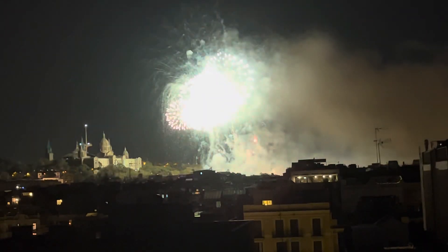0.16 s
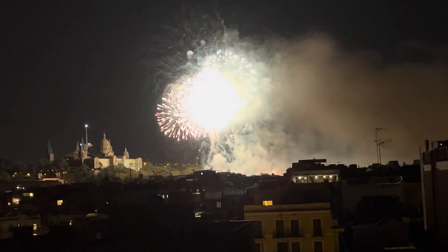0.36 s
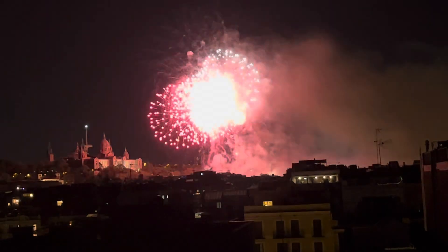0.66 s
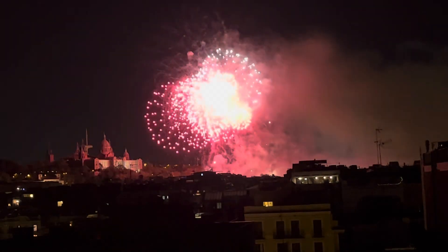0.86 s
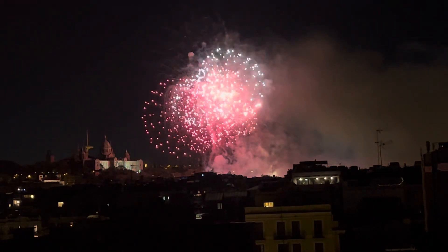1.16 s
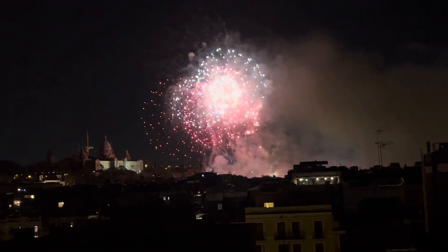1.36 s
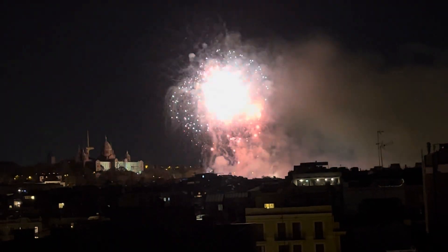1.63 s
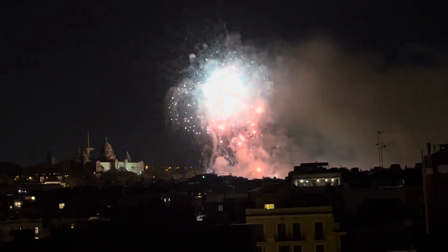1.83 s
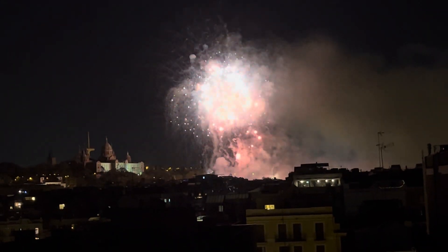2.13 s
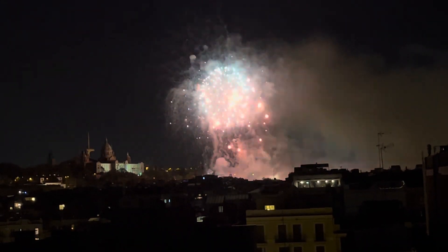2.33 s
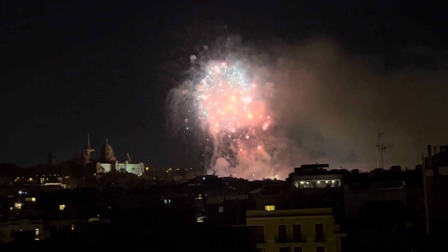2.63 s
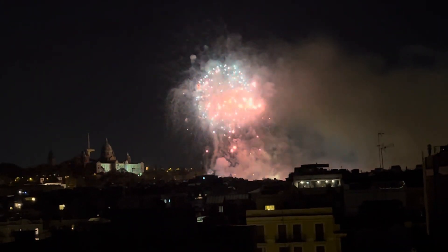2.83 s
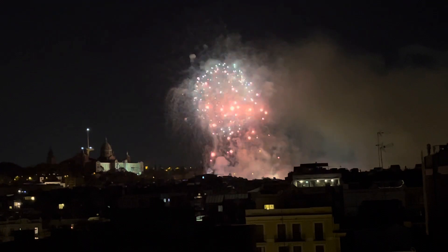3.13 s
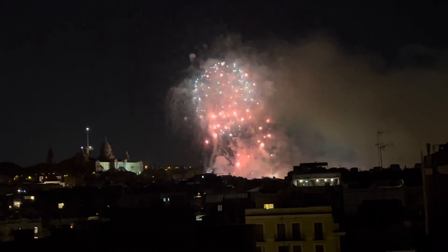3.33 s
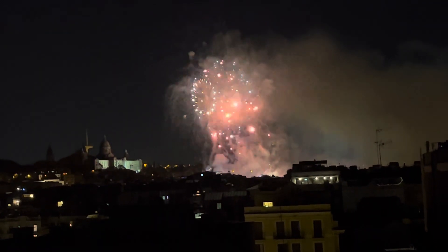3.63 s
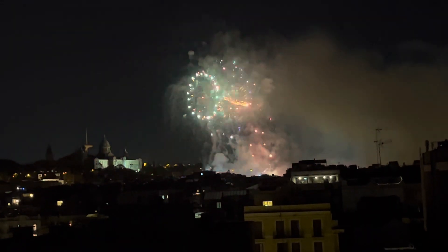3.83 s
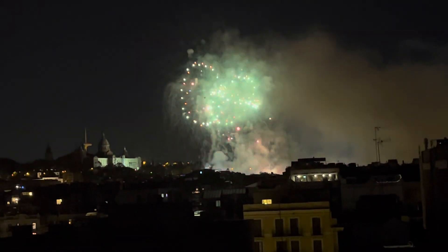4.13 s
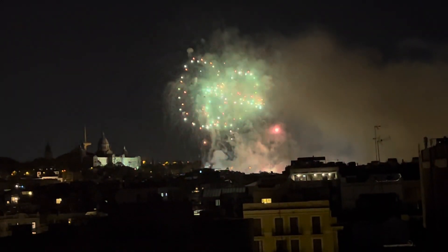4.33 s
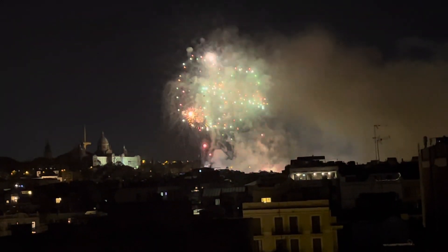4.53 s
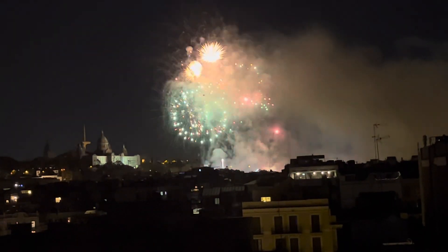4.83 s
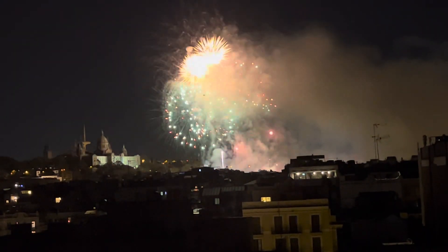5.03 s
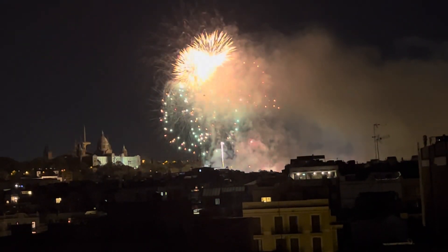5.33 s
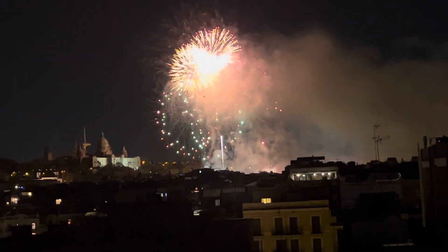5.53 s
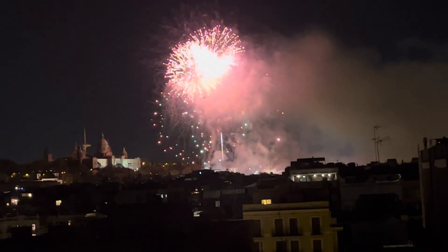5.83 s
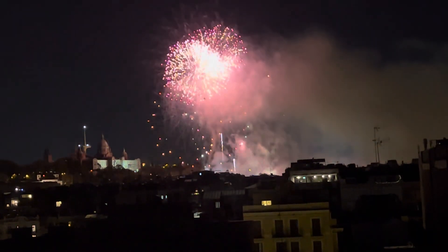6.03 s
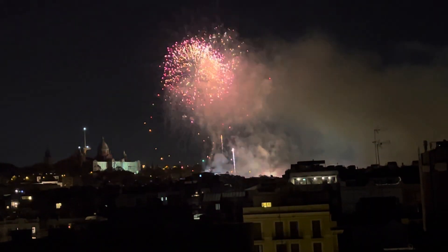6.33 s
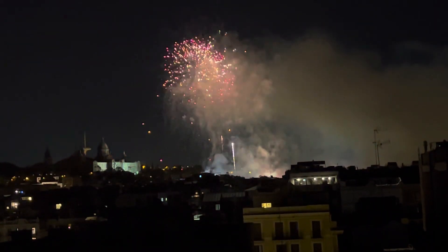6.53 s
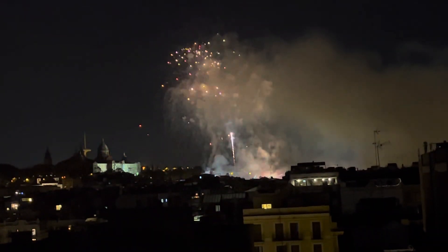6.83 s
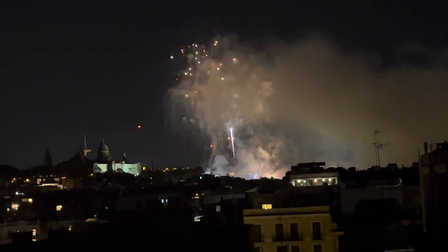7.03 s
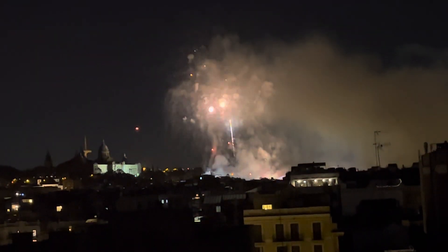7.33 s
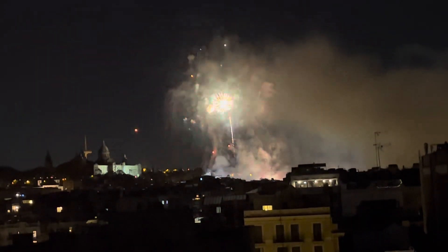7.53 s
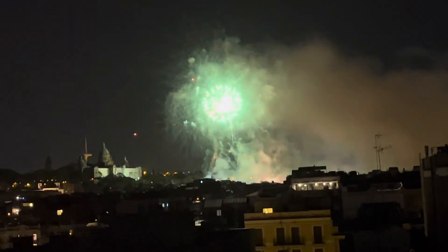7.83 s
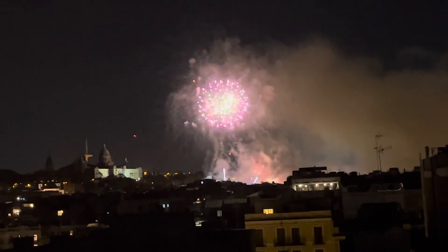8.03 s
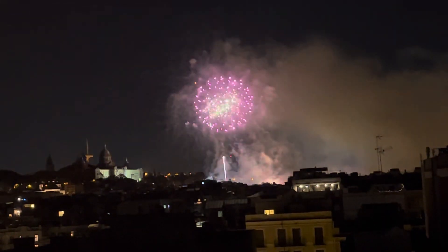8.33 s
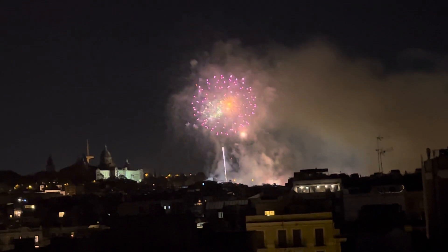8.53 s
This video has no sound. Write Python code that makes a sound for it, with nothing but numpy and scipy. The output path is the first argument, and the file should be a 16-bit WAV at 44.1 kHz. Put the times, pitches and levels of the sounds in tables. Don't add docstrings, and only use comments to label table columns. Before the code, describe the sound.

Outdoors at night, fireworks burst far away over a city, heard from a rooftop on a small stereo microphone. Earlier echoes already rumble at 0 s. A heavy bang lands at 0.1, a tight group at 0.5-0.65, then three more at 1.1-1.26. Rumble rolls and thins, with a dull launch thud near 2.3. A hard, short crack hits at 2.8, a rounder boom at 3.0. Between 3.9 and 4.3 comes a crowded volley of overlapping bangs, then single reports at 4.6 and 4.85. The rumble sinks through a long lull, with soft muffled thuds pattering at 6.5-7.1. A deep bang breaks it at 7.26, a close pair follows at 7.7, and a rapid triple at 8.55 ends abruptly in its echoes. Each bang has a blunt front, a slightly falling smear, slap-backs within 0.7 seconds, grainy roof scatter and a swelling low roll.

```python
import sys
import numpy as np
from scipy import signal
from scipy.fft import rfft, irfft, next_fast_len
from scipy.io import wavfile
from scipy.ndimage import uniform_filter1d, minimum_filter1d

SR = 44100
rng = np.random.default_rng(int(sys.argv[2]) if len(sys.argv) > 2 else 0)


def invert_db(x):
    u = np.asarray(x, float) / 20
    return 10 ** u


def persist_wave(psi):
    counts = np.round(np.clip(psi, -1, 1) * 32767).astype(np.int16)
    wavfile.write(sys.argv[1], SR, np.atleast_2d(counts).T)


N = 381906

# [t/s, level/dB, push/ms, sharp front/dB, air loss at 1 kHz/dB]
SHELL_BURSTS = [(0.1144, 10.5, 1.2, -2, 2), (0.5336, 7, 0.76, 3, 2.5), (0.6264, 13, 0.45, -17.5, 1.5),
                (0.6549, 13.5, 0.72, -26.5, 1), (1.0742, 10.5, 1.1, -2, 2), (1.214, 11, 1.12, -10, 1),
                (1.2605, 13.5, 0.64, -31.5, 0.5), (2.808, 20, 0.33, -14.5, 3.5),
                (2.9687, 12, 0.75, -12, 1.5), (3.9229, 13, 0.57, -3, 3), (3.9409, 6.5, 0.76, 3, 1.5),
                (3.9461, 6.5, 1.4, -9, 1.5), (4.0567, 10.5, 0.98, -20, 1), (4.3024, 14.5, 0.47, -7.5, 2),
                (4.3128, 6.5, 1.3, -11.5, 0.5), (4.5691, 11.5, 0.52, -19, 2),
                (4.8528, 13.5, 0.42, -14, 3.5), (7.2635, 12.5, 1.3, -9.5, 0.08),
                (7.6829, 14.5, 0.98, -8.5, 1.5), (7.7205, 12, 0.88, -13.5, 1), (8.5474, 11.5, 0.36, -8, 2),
                (8.5572, 6.5, 0.94, -11, 0.5), (8.5663, 9.5, 0.37, -18, 1.5)]
# [t/s, level/dB, air loss at 1 kHz/dB]
LIFT_CHARGES = [(0.465, -29.5, 6), (2.311, -33, 7.5), (2.327, -17.5, 11), (3.226, -29, 6),
                (3.318, -26, 7.5), (3.849, -27, 8), (3.9606, -41.5, -1.3), (5.824, -47, 5.5),
                (6.522, -51.5, 12), (6.666, -30.5, 10), (6.761, -25, 17.5), (6.849, -25.5, 8),
                (6.866, -23, 15.5), (6.893, -20.5, 15.5), (6.92, -34, 5), (7.097, -27.5, 14.5)]


def evened(x):
    return x / np.sqrt(np.mean(x ** 2) + 1e-20)


def read(points, hz):
    f, value = np.transpose(points)
    return np.interp(np.log(hz + 1), np.log(f + 1), value)


def ear_pair(left, other, hz):
    # [f/Hz, likeness 0-1]
    likeness = [(60, 0.99), (99, 1.0), (160, 0.99), (270, 0.95), (450, 0.48), (750, 0.99), (1250, 0.41),
                (2070, 0.75), (3430, 1), (5690, 0.23)]
    same = np.clip(read(likeness, hz), 0, 1)
    return np.array([left, same * left + np.sqrt(1 - same ** 2) * other])


def strikes():
    earlier_s = [-0.45, -.2]
    # [t/s, strength/dB]
    strength = [(-.55, 2.5), (-.2, -2), (.11, -5.5), (.53, -10.5), (.65, -8.5), (1.07, -3), (1.26, -3),
                (2.81, -4.5), (2.97, -11), (3.94, -6), (4.06, -5.5), (4.31, -5.5), (4.57, -13),
                (4.85, -18.5), (7.26, 1), (7.7, -3.5), (8.55, -3)]
    s = np.array([*earlier_s, *[row[0] for row in SHELL_BURSTS]])
    loss_db = np.array([1.5] * len(earlier_s) + [abs(row[4]) for row in SHELL_BURSTS])
    return s, np.interp(s, *np.transpose(strength)), loss_db


def city_level(level_db, share, dull_per_loss, floor_db):
    # [delay/s, level/dB]
    swell = [(0, -0.5), (.06, -7), (.16, -9.5), (.25, 1), (.4, -1), (.6, -5.5), (.9, -8.5), (1.4, -22.5),
             (2.4, -37)]
    lift_echo_db = 10.5
    s, strike_db, loss_db = strikes()
    lift_s, lift_db, lift_loss_db = np.transpose(LIFT_CHARGES)
    s = np.r_[s, lift_s]
    source_db = np.r_[strike_db, lift_db + lift_echo_db]
    source_db = source_db - dull_per_loss * np.r_[loss_db, lift_loss_db]
    t = np.arange(0, N / SR + .01, .005)
    swell_db = np.interp(t[:, None] - s, *np.transpose(swell), left=-200, right=-200)
    power = (invert_db(level_db + source_db + share * swell_db) ** 2).sum(1)
    power += invert_db(floor_db) ** 2
    return np.interp(np.arange(N) / SR, t, np.sqrt(power))


def echoes(colour, level, per_s, spread_db, lumpy_db):
    hz = np.fft.rfftfreq(N, 1 / SR)
    clumps = uniform_filter1d(uniform_filter1d(rng.standard_normal(N), 900), 900)
    clumps = evened(clumps)
    hits = rng.standard_normal((2, N)) * (rng.random((2, N)) < per_s / SR)
    size_db = spread_db * np.minimum(rng.exponential(1, (2, N)), 5)
    hits *= invert_db(size_db + lumpy_db * clumps)
    pair = ear_pair(*rfft(hits), hz)
    return level * evened(irfft(pair * invert_db(read(colour, hz)), N))


def city_echoes():
    # [f/Hz, density/(dB per Hz)]
    roll_colour = [(25, 20), (50, 21.5), (90, -6.5), (130, 4), (200, 4.5), (300, 1.15), (420, -11),
                   (700, -45), (1200, -52.5)]
    # [f/Hz, density/(dB per Hz)]
    wash_colour = [(200, -4.5), (400, 0.5), (600, -1), (950, -5), (1200, -13), (1600, -12), (2100, -18),
                   (3000, -32), (5000, -54.5)]
    # [f/Hz, density/(dB per Hz)]
    fizz_colour = [(700, -12.5), (1200, 0), (1650, 2), (2200, -2), (3200, -7.5), (4600, -15.5), (5800, -24),
                   (7500, -38), (11000, -51)]
    roll_level = city_level(level_db=-26.5, share=0.85, dull_per_loss=0.32, floor_db=-42)
    wash_level = city_level(level_db=-43, share=0.72, dull_per_loss=0.47, floor_db=-59)
    fizz_level = city_level(level_db=-51, share=0.76, dull_per_loss=1.5, floor_db=-76.5)
    roll = invert_db(5.5) * echoes(roll_colour, roll_level, per_s=2500, spread_db=1.0, lumpy_db=1.0)
    wash = invert_db(4) * echoes(wash_colour, wash_level, per_s=4000, spread_db=1.0, lumpy_db=-0.3)
    fizz = invert_db(4) * echoes(fizz_colour, fizz_level, per_s=8000, spread_db=2.5, lumpy_db=.7)
    return roll + wash + fizz


def sparse_tail(size):
    # [f/Hz, t60/s]
    decay = [(100, 0.66), (400, 0.45), (1500, 0.22), (3000, 0.35), (5000, 0.045), (10000, 0.0089)]
    slots = np.arange(30, size - 24, 24)
    at = slots + rng.integers(0, 24, (2, len(slots)))
    taps = np.zeros((2, size))
    np.put_along_axis(taps, at, rng.standard_normal(at.shape), axis=1)
    taps *= 1 + 7 * np.exp(-np.arange(size) / 170)
    hz, t, z = signal.stft(taps, SR, nperseg=256)
    z *= (hz / (hz + 250))[:, None]
    z = ear_pair(*z, hz[:, None]) * invert_db(-60 * t / read(decay, hz)[:, None])
    tail = signal.istft(z, SR, nperseg=256)[1][:, :size]
    return tail / np.linalg.norm(tail[0])


def blast(push_ms, front_db, loss_db, size=1024):
    rounding_hz = 168
    rebound_db, rebound_hz = -10.5, 516
    u = np.arange(size) / SR * 1000 / push_ms
    hz = np.fft.fftfreq(size, 1 / SR)
    khz = abs(hz) / 1000
    log_gain = np.log(invert_db(-abs(loss_db) * khz ** 1.4 / (1 + khz / 9.0)))
    air = np.exp(log_gain - 1j * signal.hilbert(log_gain).imag)
    front = min(invert_db(front_db), 1)
    rounding = front + (1 - front) / (1 + 1j * hz / rounding_hz)
    s = 1j * hz / rebound_hz
    push_end = np.exp(-2j * np.pi * hz * push_ms / 1000)
    air *= 1 - invert_db(rebound_db) * s / (1 + s) * push_end
    jump = np.fft.fft((1 - u) * np.exp(-u))
    return np.fft.ifft(jump * air * rounding).real / np.sqrt(push_ms)


def bangs(rows, lift_db):
    # [delay/ms, level/dB]
    first_roofs = [(1.84, -12.5), (8.07, -16)]
    path = np.zeros(600)
    path[0] = 1
    for ms, db in first_roofs:
        blur = signal.windows.hann(3 + round(3 * ms))
        first = round(ms * SR / 1000) - len(blur) // 2
        path[first:first + len(blur)] = -invert_db(db) * blur / blur.sum()
    out = np.zeros((2, N + SR))
    for s, db, push_ms, front_db, loss_db, scatter_db in rows:
        wave = invert_db(db + lift_db) * blast(push_ms, front_db, loss_db)
        at = round(s * SR)
        direct = np.convolve(wave, path)
        spray = invert_db(scatter_db) * signal.fftconvolve(wave[None], sparse_tail(size=6144), axes=1)
        out[:, at:at + len(direct)] += direct
        out[:, at:at + spray.shape[1]] += spray
    return out[:, :N]


def slap_backs():
    # [delay/s, slap/dB, dull boom/dB]
    walls = [(.172, -42.5, -21), (.236, -32, -13.5), (.255, -34.5, -23), (.345, -34, -24),
             (.363, -31, -15.5), (.512, -34, -22), (.69, -36, -20.5)]
    # [delay/s, level/dB]
    ledges = [(0.044, -45.5), (.075, -36), (.116, -40.5), (.129, -38)]
    # [push/ms, front/dB, air loss at 1 kHz/dB, scatter/dB]
    slap = (0.6, -6, 1.8, 8.5)
    boom = (1.18, -22, 5, -2.5)
    tick = (2.5, 1.5, -3.2, -11.5)
    dull_hz, dull_per_loss = 900, 3.3
    answer = bangs([(s, db, *slap) for s, db, _ in walls], lift_db=8.5)
    answer += bangs([(s, db, *boom) for s, _, db in walls], lift_db=10)
    answer += bangs([(s, db, *tick) for s, db in ledges], lift_db=1.5)
    answer = answer[:, :SR]
    lows = signal.lfilter(*signal.butter(1, dull_hz, fs=SR), answer)
    highs = answer - lows
    s, strike_db, loss_db = strikes()
    highs_db = strike_db - dull_per_loss * (loss_db - 1)
    out = 0
    for part, db in (lows, strike_db), (highs, highs_db):
        train = np.zeros(N + SR)
        train[np.round((s + 1) * SR).astype(int)] = invert_db(db)
        out = out + signal.oaconvolve(train[None], part, axes=1)[:, SR:SR + N]
    return out


def lift_charges():
    push_ms, front_db, scatter_db = .6, -4.5, 0.5
    rows = [(s, db, push_ms, front_db, loss_db, scatter_db) for s, db, loss_db in LIFT_CHARGES]
    return bangs(rows, lift_db=10.0)


def shell_bursts():
    scatter_db, scatter_per_front = -11, -0.14
    rows = [(*row, scatter_db + scatter_per_front * row[3]) for row in SHELL_BURSTS]
    return bangs(rows, lift_db=0.5)


def scene():
    return city_echoes() + slap_backs() + lift_charges() + shell_bursts()


def top_cut(x):
    return signal.sosfilt(signal.butter(12, 16300, fs=SR, output="sos"), x)


def record(dry):
    # [f/Hz, level/dB]
    port_db = [(140, 0), (210, -.6), (310, -1.6), (480, 2), (720, 1.8), (1090, 2.8), (1640, 1), (2490, -.5),
               (3760, 0), (9000, 0)]
    # [f/Hz, phase/rad]
    port_rad = [(300, 0), (520, .5), (780, .9), (1100, .1), (1460, -.3), (1720, -1.5), (2000, -.3),
                (3270, .35), (5080, 0), (5900, -1.9), (6800, -3), (7600, -5.8), (11000, -5.6),
                (13000, -4.5)]
    # [f/Hz, level/dB]
    treble = [(5000, 0), (6300, -2.5), (7500, -8.5), (9000, -11.5), (11000, -18), (12500, -26),
              (16500, -26.5)]
    # [f/Hz, width/Hz, level over flat/dB]
    resonances = [(1630, 313, -3), (9500, 70, 10.5), (9920, 62, 8)]
    # [f/Hz, Q]
    splitters = [(131, .92), (288, .92), (3074, .92)]
    # [f/Hz, Q]
    bass_cut = (90.6, 2.16)
    half_splitter_hz, hiss_db = 1307, -91
    size = next_fast_len(N + 8192)
    hz = np.fft.rfftfreq(size, 1 / SR)
    ports = np.sqrt(invert_db(read(port_db, hz)) + 0j) * np.exp(1j * read(port_rad, hz) / 2)
    chain = invert_db(read(treble, hz)) + 0j
    for ring_hz, width_hz, ring_db in resonances:
        chain *= 1 + invert_db(ring_db) / (1 + 1j * (hz - ring_hz) / (width_hz / 2))
    s = 1j * hz / bass_cut[0]
    chain *= (s * s / (s * s + s / bass_cut[1] + 1)) ** 2
    for split_hz, q in splitters:
        s = 1j * hz / split_hz
        chain *= (s * s - s / q + 1) / (s * s + s / q + 1)
    s = 1j * hz / half_splitter_hz
    chain *= (1 - s) / (1 + s)
    hiss = invert_db(hiss_db) * rng.standard_normal(dry.shape)
    spectra = rfft(dry + hiss, size) * chain * np.array([ports, 1 / ports])
    x = irfft(spectra, size)[:, :N]
    room_left = np.minimum(1, .94 / (abs(x).max(0) + 1e-9))
    gain = uniform_filter1d(minimum_filter1d(room_left, size=181), size=90)
    return top_cut(x * gain)


dry = scene()
out = record(dry)
persist_wave(out)
```